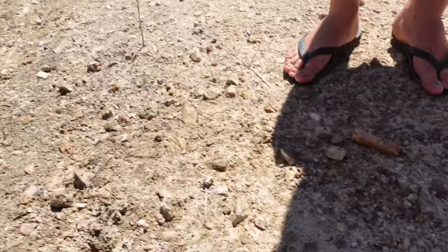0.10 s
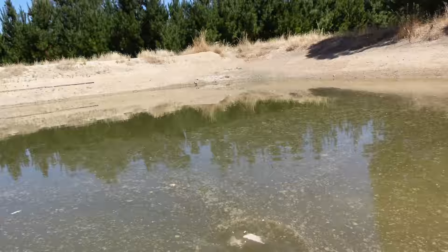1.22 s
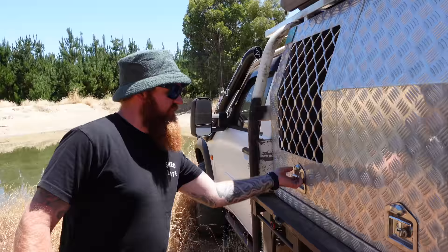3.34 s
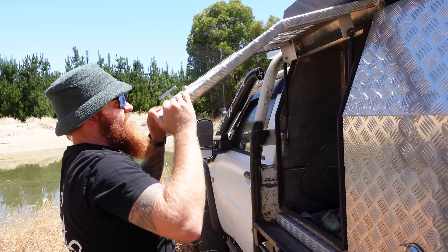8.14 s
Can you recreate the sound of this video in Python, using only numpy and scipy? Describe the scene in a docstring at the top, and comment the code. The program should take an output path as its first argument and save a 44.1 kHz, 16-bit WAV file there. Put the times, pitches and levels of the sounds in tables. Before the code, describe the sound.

Water plops and bubbles twice, then an aluminium door creaks open, its latch clanking and hands rubbing the panel before a hard shudder.

```python
"""Two small splashes slap a still pond and break into ringing bubbles, with a few drips between them.
Then, close by, the aluminium canopy door of a parked truck squeals and creaks free of its seal.
The sheet booms, gas hisses through the struts, and the steel latch clanks as it is worked.
Hands and sleeves rub over the sheet between knocks and dull thuds, and the hollow canopy rumbles.
At the end the door shudders hard and its frame rings on, over a bed of open air."""
import sys
import numpy as np
from scipy import signal
from scipy.fft import rfft, irfft, next_fast_len
from scipy.io import wavfile
from scipy.ndimage import uniform_filter1d, minimum_filter1d, map_coordinates

SR = 44100
rng = np.random.default_rng(int(sys.argv[2]) if len(sys.argv) > 2 else 0)


def log_audio(samples):
    """Write samples as a 16-bit WAV file to the path given in sys.argv[1]."""
    # one column per channel
    frames = np.atleast_2d(samples).T
    # limit to full scale, then quantise
    limited = np.clip(frames, -1, 1)
    pcm = np.round(limited * 32767).astype(np.int16)
    wavfile.write(sys.argv[1], SR, pcm)


N = 407043

# hits on the door, on the latch, and dull ones against the truck:
# (time [s], rattle length [s], bass [dB], mids [dB], treble [dB])
DOOR_HITS = [(3.874, .06, -27, -27, -34), (3.94, .075, -20.5, -21, -29), (4.254, .01, -37, -23.5, -31),
             (4.329, .025, -30, -20.5, -32), (4.694, .005, -34, -31, -34), (4.767, .028, -32, -28, -27.5),
             (6.274, .004, -43, -34.5, -43), (6.748, .025, -29, -24, -27.5), (6.8, .035, -27, -26, -37),
             (6.873, .015, -35, -34, -39), (6.967, .02, -41, -38, -39), (7.014, .014, -32, -20, -28.5),
             (8.53, .008, -47, -34, -45), (8.568, .006, -42, -29, -41), (8.89, .035, -21, -18, -22.5),
             (8.932, .135, -27, -15.3, -21), (9.187, .04, -41, -31, -35.5)]
LATCH_HITS = [(4.626, 0.018, -55, -23.5, -23.5), (4.786, 0.005, -36.5, -33.5, -30),
              (4.905, 0.0044, -44, -50, -38.5), (5.255, 0.0035, -63, -52, -45.0),
              (5.441, 0.015, -66, -37.5, -55), (8.1, 0.004, -47, -25, -31.5), (8.38, 0.016, -57, -45, -39),
              (8.818, 0.0018, -60, -41, -49), (9.196, .025, -50, -30, -37)]
THUD_HITS = [(5.672, .01, -42, -43, -55), (5.82, .03, -44, -42, -52), (6.31, .015, -38, -43, -52),
             (6.39, .02, -40, -40, -56)]
# crossovers of a hit: (bass to mids [Hz], mids to treble [Hz])
CROSSOVERS = [350, 2200]
# tone colour of each struck body: (frequency [Hz], level [dB])
DOOR_EQ = [(21, -21), (35, -27), (136, 2.5), (490, -3), (684, -2.5), (778, -2), (1110, -3), (1810, -8.5),
           (2280, -12), (3020, -11.5), (4920, -20), (5890, -19), (8430, -27.5), (9580, -27), (16000, -50.5)]
LATCH_EQ = [(47, -23), (80, -2), (296, -29.5), (378, -43), (672, -9.5), (802, -47), (877, -3), (1820, -3.5),
            (2180, -12.5), (3030, -11), (7530, -13), (10000, -32), (16000, -78)]
THUD_EQ = [(60, -22), (200, 1.5), (350, -1.5), (550, 1.5), (900, -7), (1500, -22), (5000, -28),
           (16000, -50)]
# decay of each body's dense ring: (frequency [Hz], t60 [s])
DOOR_DECAY = [(100, 0.14), (400, 0.28), (1200, 0.17), (4000, 0.12), (12000, 0.071)]
LATCH_DECAY = [(200, 0.45), (1500, 0.19), (5000, 0.11), (12000, 0.043)]
THUD_DECAY = [(200, 0.18), (800, .1), (4000, .05)]
# clear notes of each ringing part: (frequency [Hz], level [dB], t60 [s])
DOOR_MODES = [(88.973, -10, 0.36), (142, -2, 0.7), (256.4, -8, 0.3), (543, -0.5, 0.17), (677, -1, 0.12),
              (873, -12.5, 0.13), (927, -10.5, 0.44), (1130, -11.5, 0.33), (1573, -18, 0.08)]
LATCH_MODES = [(692, -21, .13), (902.78, -10, 0.1302), (1407, -3, 0.2), (1572, 5.5, 0.12), (1829, -2, 0.13),
               (2774, -3.5, 0.1334), (2950, -15, .15), (3190, -6, 0.1), (4157, -8.5, .1),
               (5500, -13.5, .05), (7100, -60, .06)]
THUD_MODES = [(220, 0, 0.21), (537, -4, .1)]
FRAME_MODES = [(387, 3.5, 1), (413.5, 11, .3), (565, -6, 1), (727, -5, .6), (985, -15, 0.651)]
SPRING_MODES = [(9930, 8.5, 0.12), (10020, 1, 0.12), (9650, 0, .2)]
# hits that ring the door frame and ping the latch spring: (time [s], level [dB])
FRAME_HITS = [(5.441, -50), (9.02, -23)]
SPRING_HITS = [(3.53, -26), (4.628, -37), (9.015, -45), (9.043, -34)]
# sharp snaps of metal on metal: (time [s], level [dB], click tuning [Hz])
ROD_SNAPS = [(3.676, -22, 1180), (3.795, -19, 3300), (3.874, -29, 7060), (4.331, -17, 1112),
             (6.273, -26.5, 3108), (6.931, -30, 3500), (7.603, -33, 3000), (8.1, -30, 6606),
             (8.755, -29, 1180), (8.82, -26, 1300), (8.9305, -8, 3300), (8.996, -14, 3480)]

# slides of the squealing metal, its lower shriek and the creaking seal: (start [s], end [s],
# attack [s], release [s], level [dB], first pitch [Hz], target pitch [Hz], slowing time [s])
SQUEAL_SLIDE = (3.38, 3.535, .022, .045, -15, 6450, 5000, .15)
UNDERTONE_SLIDE = (3.5, 3.545, .03, .06, -24, 4800, 4200, .035)
CREAK_SLIDE = (3.515, 3.855, .185, .04, -24, 1330, 820, .12)
# roughness of each slide: (time [s], chatter [0-1])
SQUEAL_CHATTER = [(3.39, .9), (3.403, .25), (3.416, .8), (3.445, .65), (3.485, .15), (3.52, .9)]
UNDERTONE_CHATTER = [(3.5, .8)]
CREAK_CHATTER = [(3.65, .95), (3.69, .35), (3.8, .5), (3.83, .08)]
# grit of metal, grit of rubber, and how the squealing part radiates: (frequency [Hz], level [dB])
SCRAPE_EQ = [(200, -30.5), (400, -33), (800, -20.5), (3500, -20.5), (5000, 0), (6300, -5.5), (7300, -50),
             (8500, -19), (10000, -24), (11600, -15), (13500, -30), (16000, -48)]
SEAL_EQ = [(100, -26), (220, -5), (330, -17), (600, -10), (900, -6.5), (1220, -0.5), (1700, -13),
           (2600, -16.5), (3200, -8.5), (4000, -25), (5600, -13.5), (8000, -25), (16000, -48)]
RADIATION_EQ = [(4000, 0), (6700, 0), (7600, -7), (9500, -5), (11000, 2), (12600, -1), (14500, -14)]

# spurts of gas through the struts: (start [s], end [s], opening level [dB])
GAS_SPURTS = [(4.25, 4.8, -45), (4.96, 5.08, -50)]
# colour of the gas hiss: (frequency [Hz], level [dB])
HISS_EQ = [(2000, -34), (4000, -11), (5500, -2), (8000, -3), (10000, 4), (11500, -5), (14000, -5),
           (16000, -13)]
# whistles that climb in the hiss: (time [s], first pitch [Hz], level [dB])
GAS_WHISTLES = [(4.3, 7200, -47), (4.33, 5900, -48), (4.42, 8800, -43), (4.518, 7800, -38),
                (4.56, 5400, -42), (4.685, 8200, -36)]

# hand and sleeve strokes on the sheet: (midpoint [s], length [s], rub [dB], swish over rub [dB])
HAND_STROKES = [(4.15, .18, -45, -11), (5.29, .12, -47, -9), (5.63, .1, -60, 5), (5.89, .18, -49, -8),
                (6.09, .24, -45.5, -8), (6.5, .1, -52, 6), (6.6, .16, -54, 0), (6.88, .24, -48, 6),
                (7.2, .14, -47, 0), (7.38, .32, -43.5, 0), (7.6, .1, -48, -4), (7.92, .2, -47, -9),
                (8.22, .12, -49, -3), (8.47, .2, -48, -6), (8.68, .09, -47, 1), (8.8, .22, -44, -9)]
# a hand leans on the sheet: (midpoint [s], length [s], level [dB])
HAND_PRESSES = [(6.13, .2, -49), (7.57, .06, -42), (7.88, .16, -46), (8.06, .22, -41), (8.69, .1, -46)]
# sleeves are never quite still: (start [s], end [s], attack [s], release [s])
SLEEVE_FIDGET = (3.5, 9.23, .1, .1)
# canopy rumble, dull rub and bright swish: (frequency [Hz], level [dB])
RUMBLE_EQ = [(21, -23), (35, -44), (80, -0.5), (176, -0.5), (207, 4.5), (377, -7.5), (415, -1.5),
             (475, -7.5), (900, -13.5), (1170, -54), (1980, -120)]
RUB_EQ = [(350, -16.5), (700, -3), (1800, 1), (3000, -3), (4500, -5), (6500, -30.5)]
SWISH_EQ = [(3500, -24.5), (5500, 5.5), (8000, 0.5), (10000, -4), (13000, -10), (16000, -25)]

# slaps that make up the two splashes: (time [s], level [dB], decay time [s])
WATER_SLAPS = [(.615, -31, .025), (.636, -13.5, .009), (.668, -28, .04), (.743, -22.5, .012),
               (2.123, -23.5, .002), (2.227, -22.5, .0025), (2.365, -42, .06), (2.464, -34, .0036),
               (2.525, -36.5, .045), (2.599, -20.5, .0025), (2.626, -27.5, .016)]
# the largest bubbles: (time [s], level [dB], first pitch [Hz], t60 [s])
BIG_BUBBLES = [(.641, -13.5, 1094, .017), (.678, -18.5, 1700, .011), (.686, -24, 565, .06),
               (.727, -22, 1050, .017), (.751, -13, 2283, .01), (.843, -40, 1421, .1),
               (.919, -31.5, 950, .1), (2.209, -30, 854, .013), (2.471, -28.5, 2494, .033),
               (2.553, -29, 2190, .042), (2.603, -36, 915, .09), (2.624, -20, 1900, .013),
               (2.636, -23, 1420, .021), (2.647, -25.5, 2541, .035)]
# a thin string of drips on one pitch: (time [s], level [dB])
DRIPS = [(1.277, -39), (1.304, -39), (1.372, -36), (1.4, -37), (1.445, -27.5)]
# cavities that close with a steeply rising gloop: (time [s], level [dB])
GLOOPS = [(.773, -35), (2.665, -36)]
# the splashes move from left to right: (time [s], left minus right [dB])
POND_PAN = [(1.4, 1.5), (2.5, -4)]

# open air over the water: (frequency [Hz], level [dB])
AIR_EQ = [(18, -99), (30, -26.5), (189, -6.5), (233, -5.5), (273, -5), (374, -10.5), (569, -8),
          (1070, -17.5), (1320, -15), (2410, -22), (16000, -37)]
# reflections off the truck's side and the ground: (frequency [Hz], t60 [s])
REFLECTION_DECAY = [(150, 0.48), (1500, 0.073), (10000, 0.03336)]
# slight lean of the stereo image: (frequency [Hz], left minus right [dB])
STEREO_LEAN = [(60, .5), (200, .2), (600, -1.2), (2400, -1.1), (6000, -2.2), (10000, .5)]


def door():
    """The aluminium sheet booms and rattles; its frame sings on after the hardest hit."""
    sheet = strike(DOOR_HITS, DOOR_EQ, DOOR_DECAY, DOOR_MODES,
                   clear_db=-6.5, crack_db=-6, rattle_rate=600, rattle_db=-6.5)
    return amp(-2.5) * sheet + sing(FRAME_HITS, FRAME_MODES, swell_s=.017)


def latch():
    """The steel latch clanks against its keeper, its rods snap and its spring pings."""
    out = strike(LATCH_HITS, LATCH_EQ, LATCH_DECAY, LATCH_MODES,
                 clear_db=2, crack_db=-4, rattle_rate=600, rattle_db=-4)
    for s, db, hz in ROD_SNAPS:
        add(out, s, amp(db) * click(hz, t60=.027))
    return out + sing(SPRING_HITS, SPRING_MODES, swell_s=.0052)


def squeal(surge_db=2, surge_peak_s=3.415, surge_period_s=.105):
    """Bare metal shrieks in two rough tones that sink as it slows; the upper one surges twice."""
    high = stick_slip(SQUEAL_SLIDE, SQUEAL_CHATTER, slip_rate=330, slip_t60=.0065,
                      harmonics_db=[1.3, -26], grit_eq=SCRAPE_EQ, grit_db=-10.5, waver=.011)
    low = stick_slip(UNDERTONE_SLIDE, UNDERTONE_CHATTER, slip_rate=300, slip_t60=.005,
                     harmonics_db=[0], grit_eq=SCRAPE_EQ, grit_db=-20, waver=.03)
    surge = amp(surge_db * np.cos(2 * np.pi * (np.arange(N) / SR - surge_peak_s) / surge_period_s))
    return coloured(surge * high + low, RADIATION_EQ)


def creak():
    """The rubber seal grips and slips as it drags over the frame."""
    return stick_slip(CREAK_SLIDE, CREAK_CHATTER, slip_rate=170, slip_t60=.03,
                      harmonics_db=[-2.5, -36, -32, -21], grit_eq=SEAL_EQ, grit_db=1.5, waver=.012)


def water(rise=.61, spray_hz=2200, spray_rate=1900, spray_cycles=26, drip_hz=2450, drip_t60=.009):
    """A crackling slap sheds a spray of small bubbles; big ones and drips follow, each with a tick."""
    out = np.zeros(N)
    t = np.arange(SR // 3) / SR
    slap_eq = [(100, -20), (450, 4), (1100, 3.5), (1800, 13), (3000, 7), (7500, 5.5), (11000, 0),
               (16000, -9.5)]
    for s, db, decay in WATER_SLAPS:
        attack = 1 - np.exp(-t / (.25 * decay))
        fall = np.exp(-t / decay) + .1 * np.exp(-t / (7 * decay))
        crackle = unit(rng.standard_normal(len(t)) * amp(3.5 * wobble(600, len(t))))
        add(out, s, amp(db - 10) * coloured(crackle * attack * fall, slap_eq))
        for wait, pitch, softness in rng.random((int(spray_rate * decay) + 1, 3)):
            hz = spray_hz * 3 ** (2 * pitch - 1)
            onset = s - 2 * decay * np.log(1 - wait)
            gain = amp(db - 3 - 10 * softness - 10 * wait)
            add(out, onset, gain * bubble(hz, spray_cycles / hz, rise))
    drips = [(s, db, drip_hz, drip_t60) for s, db in DRIPS]
    for s, db, hz, t60 in BIG_BUBBLES + drips:
        climb = rise * min(1, hz / 2200) ** 2  # big, deep bubbles climb less
        add(out, s, amp(db) * bubble(hz, t60, climb))
        add(out, s, amp(db - 11) * click(1.45 * hz, t60=.0054))
    for s, db in GLOOPS:
        add(out, s, amp(db) * bubble(hz=900, t60=.08, rise=2.6))
    return out


def spatter(most_drops=150, mean_flight_s=.2, drop_hz=3600, drop_cycles=18):
    """Fine drops fall back one after another; soft or brief slaps throw up few."""
    out = np.zeros(N)
    for s, db, decay in WATER_SLAPS:
        thrown = min(1, 3 * amp(db)) * min(1, decay / .009)
        for wait, pitch, softness in rng.random((int(most_drops * thrown) + 1, 3)):
            hz = drop_hz * 2 ** (2 * pitch - 1)
            landing = s - mean_flight_s * np.log(1 - wait)
            gain = amp(db - 19 - 8 * softness - 4.9 * wait)
            add(out, landing, gain * bubble(hz, drop_cycles / hz, rise=.3))
    return out


def struts(growth_db_per_s=15, whistle_s=.17, climb_hz_per_s=12500):
    """Gas squeezes through the struts: each spurt builds, and whistles sweep up through the first."""
    t = np.arange(N) / SR
    flow = np.zeros(N)
    for start, end, db in GAS_SPURTS:
        build = amp(db + growth_db_per_s * (np.minimum(t, end) - start))
        flow += build * envelope(t, start, end, attack=.07, release=.07)
    out = flow * rush(HISS_EQ, grain_db=3, rate=300)
    n = int(whistle_s * SR)
    for s, first_hz, db in GAS_WHISTLES:
        hz = (first_hz + climb_hz_per_s * t[:n]) * (1 + .0223 * wobble(1200, n))
        whistle = np.sin(2 * np.pi * np.cumsum(hz) / SR)
        add(out, s, amp(db) * np.sqrt(2 * np.hanning(n)) * whistle)
    return out


def thuds():
    """Soft, heavy contacts against the truck, with hardly any ring."""
    return strike(THUD_HITS, THUD_EQ, THUD_DECAY, THUD_MODES,
                  clear_db=-4.5, crack_db=-7, rattle_rate=500, rattle_db=-4)


def handling():
    """Hands and sleeves rub and swish on the sheet; strokes, presses and hits make the canopy rumble."""
    fidget = envelope(np.arange(N) / SR, *SLEEVE_FIDGET) * amp(2 * wobble(12))
    shake = canopy_shake()
    presses = swells(HAND_PRESSES)
    strokes = swells([(s, length, db) for s, length, db, _ in HAND_STROKES])
    bright_strokes = swells([(s, length, db + bright) for s, length, db, bright in HAND_STROKES])
    rumble = np.linalg.norm([amp(-8) * shake, presses, amp(-8) * strokes, amp(-57) * fidget], axis=0)
    buzz = amp(-15) * shake  # the sheet buzzes along with the canopy
    rub = np.linalg.norm([buzz, strokes, amp(-55) * fidget], axis=0)
    swish = np.hypot(bright_strokes, amp(-61) * fidget)
    return (rumble * rush(RUMBLE_EQ, grain_db=3, rate=51)
            + rub * rush(RUB_EQ, grain_db=2.5, rate=240)
            + swish * rush(SWISH_EQ, grain_db=3, rate=310))


def canopy_shake(swell_s=.035, t60=1.3):
    """Gain curve of the hollow canopy, which stores the bass of each hit and lets it fade."""
    t = np.arange(2 * SR) / SR
    power = np.zeros(N)
    bloom = (1 - np.exp(-t / swell_s)) * fade(t, t60)
    for s, _, bass_db, *_ in DOOR_HITS + THUD_HITS:
        add(power, s, (amp(bass_db) * bloom) ** 2)
    return np.sqrt(power)


def air(bed_db=-57, ring_db=-52.5):
    """A steady bed of open air; a faint high ring dies away at the start."""
    ring_eq = [(600, -44), (1280, -12.5), (1390, -1.5), (1520, -17), (1850, -14.5), (2600, -22),
               (3900, -19), (9000, -34.5)]
    bed = unit(coloured(rng.standard_normal(N), AIR_EQ))
    ring = unit(coloured(rng.standard_normal(N), ring_eq))
    return amp(bed_db) * bed + amp(ring_db) * ring * fade(np.arange(N) / SR, t60=1.35)


def strike(hits, eq, decay, clear_modes, clear_db, crack_db, rattle_rate, rattle_db):
    """A loose part hits and chatters; every contact cracks and rings the body."""
    out = np.zeros(N)
    t = np.arange(SR // 2) / SR
    lead_s, lead_db = .004, -16  # a light touch just ahead of each hit
    splits = [(CROSSOVERS[0], "low"), (CROSSOVERS, "band"), (CROSSOVERS[1], "high")]
    bands = [signal.butter(4, edge, kind, fs=SR, output="sos") for edge, kind in splits]
    for s, length, *levels in hits:
        crack = rng.standard_normal(len(t)) * fade(t, .0078)
        dense = coloured(tail(decay) + amp(crack_db) * crack / np.linalg.norm(crack), eq)
        body = unit(dense) + amp(clear_db) * unit(modes(clear_modes, t))
        rattle = (rng.random(len(t)) < rattle_rate / SR) & (t < length)
        contacts = amp(rattle_db) * rattle * rng.uniform(-1.71, 1.47, len(t))
        contacts[0] = 1  # the hit itself
        contacts = np.r_[amp(lead_db), np.zeros(int(lead_s * SR)), contacts]
        sound = signal.fftconvolve(contacts, body)[:len(t)]
        attack = t < length + .025  # each band's level is set over this stretch
        for sos, db in zip(bands, levels):
            band = signal.sosfilt(sos, sound)
            add(out, s - lead_s, amp(db) * band / np.sqrt(np.mean(band[attack] ** 2)))
    return out


def sing(hits, table, swell_s):
    """A lightly damped part picks up each hit and rings on."""
    out = np.zeros(N)
    t = np.arange(SR) / SR
    for s, db in hits:
        add(out, s, amp(db) * modes(table, t, scatter_db=0) * (1 - np.exp(-t / swell_s)))
    return out


def stick_slip(slide, chatter_curve, slip_rate, slip_t60, harmonics_db, grit_eq, grit_db, waver):
    """A rubbed edge sings steadily, or breaks into separate slips that each restart the tone."""
    start, end, attack, release, db, first_hz, target_hz, slowing = slide
    n = SR  # one second holds the slide and its tail
    t = np.arange(n) / SR
    force = envelope(start + t, start, end, attack, release)
    hz = target_hz + (first_hz - target_hz) * np.exp(-t / slowing)
    chatter = np.clip(np.interp(start + t, *np.transpose(chatter_curve)), 0, 1)
    gaps, sizes, turns = rng.random((3, 1000))
    onsets = np.cumsum(.4 + 1.2 * gaps) / slip_rate * SR
    heard = onsets < n
    kicks = np.zeros(n, complex)  # each slip has its own strength and phase
    kicks[onsets[heard].astype(int)] = ((.5 + sizes) * np.exp(2j * np.pi * turns))[heard]
    slip_shape = fade(t, slip_t60) * (1 - fade(t, slip_t60 / 4)) ** 2
    slips = signal.fftconvolve(kicks, slip_shape[:SR // 20])[:n]
    slips /= np.sqrt(np.average(np.abs(slips) ** 2, weights=force))
    swing = np.sqrt(1 - chatter) + np.sqrt(chatter) * slips
    swing /= np.sqrt(1 + (np.abs(swing) / 2) ** 2)  # the swing is softly capped, so its loudest peaks flatten
    phase = 2 * np.pi * np.cumsum(hz * (1 + waver * wobble(150, n))) / SR + np.angle(swing)
    tone = np.sqrt(2) * sum(amp(level) * np.sin(k * phase) for k, level in enumerate(harmonics_db, 1))
    scrape = amp(grit_db) * np.sqrt(chatter) * unit(coloured(rng.standard_normal(n), grit_eq))
    out = np.zeros(N)
    add(out, start, amp(db) * force * np.abs(swing) * (tone + scrape))
    return out


def bubble(hz, t60, rise):
    """A bubble rings and climbs in pitch as it nears the surface."""
    t = np.arange(int(t60 * SR) + 2) / SR
    chirp = np.sin(2 * np.pi * hz * (t + rise * t * t / (2 * t60)))
    return chirp * fade(t, t60) * (1 - np.exp(-t * hz))


def click(hz, t60):
    """A short broad burst of peak 1, strongest a little above hz."""
    t = np.arange(SR // 20) / SR
    eq = [(hz / 5, -24), (hz * 1.22, -2), (hz * 1.45, 0), (hz * 1.24, -10), (hz * 5, -22)]
    burst = coloured(rng.standard_normal(len(t)) * fade(t, t60), eq)
    return burst / np.abs(burst).max()


def modes(table, t, scatter_db=2):
    """Clear decaying notes, their strengths scattered anew for each hit."""
    return sum(amp(db + scatter_db * rng.normal()) * fade(t, t60) * np.sin(2 * np.pi * hz * t)
               for hz, db, t60 in table)


def tail(decay):
    """A dense ring of energy 1, each frequency dying at its own speed."""
    hz, t, spectrum = signal.stft(rng.standard_normal(SR // 2), SR, nperseg=256)
    t60 = along(decay, hz)[:, None]
    ring = signal.istft(spectrum * fade(t, t60) / np.sqrt(t60), SR, nperseg=256)[1][:SR // 2]
    return ring / np.linalg.norm(ring)


def rush(eq, grain_db, rate):
    """Grainy noise of rms 1 whose level flickers rate times a second."""
    return unit(coloured(rng.standard_normal(N) * amp(grain_db * wobble(rate)), eq))


def envelope(t, start, end, attack, release):
    """Swells over attack, holds until end, then falls by 20 dB every release."""
    return np.clip((t - start) / attack, 0, 1) ** 1.5 * amp(-20 * np.maximum(t - end, 0) / release)


def swells(rows):
    """Gain curve of smooth swells that add in power: (midpoint [s], length [s], level [dB])."""
    power = np.zeros(N)
    for s, length, db in rows:
        arch = 1 - np.linspace(-1, 1, int(length * SR)) ** 2
        add(power, s - length / 2, (amp(db) * arch) ** 2)
    return np.sqrt(power)


def coloured(x, eq, size=4096):
    """x through a minimum-phase EQ, so nothing rings ahead of an attack."""
    gain = amp(along(eq, np.fft.rfftfreq(size, 1 / SR)))
    cepstrum = irfft(np.log(gain + 1e-6))
    cepstrum[1:size // 2] *= 2
    cepstrum[size // 2 + 1:] = 0
    impulse = irfft(np.exp(rfft(cepstrum)))[:size // 2]
    return signal.oaconvolve(x, impulse)[:len(x)]


def filtered(x, response):
    """x through a zero-phase filter of gain response(hz)."""
    n = x.shape[-1]
    padded = next_fast_len(n + 8192)
    return irfft(rfft(x, padded) * response(np.fft.rfftfreq(padded, 1 / SR)), padded)[..., :n]


def along(points, hz):
    """A curve of (frequency [Hz], value) points, read on a log axis."""
    knots_hz, values = np.transpose(points)
    return np.interp(np.log(hz + 1), np.log(knots_hz + 1), values)


def wobble(rate, n=N):
    """A smooth random curve, rate knots a second."""
    return map_coordinates(rng.standard_normal(int(n * rate / SR) + 4), [np.arange(n) * rate / SR])


def fade(t, t60):
    """Exponential decay, 60 dB down after t60."""
    return np.exp(-np.log(1000) * t / t60)


def amp(db):
    """Decibels to gain."""
    return np.exp(np.asarray(db) * np.log(10) / 20)


def unit(x):
    """Scaled to rms 1."""
    return x / np.sqrt(np.mean(np.abs(x) ** 2) + 1e-20)


def add(track, s, sound):
    """Mix a sound into the track at s seconds."""
    part = track[round(s * SR):][:len(sound)]
    part += sound[:len(part)]


def scene():
    """The truck sits near centre, the splashes left then right; faint reflections add width."""
    pond = water() + spatter()
    centre = air() + door() + thuds() + latch() + squeal() + creak() + struts() + handling()
    reflection_eq = [(80, -25), (250, -22), (600, -17), (10000, -22)]  # the bass stays nearly mono
    reflections = coloured(tail(REFLECTION_DECAY), reflection_eq)
    side = signal.fftconvolve(centre + pond, reflections)[:N]
    stereo = np.array([centre + side, centre - side])
    stereo = filtered(stereo, lambda hz: amp(np.outer([.5, -.5], along(STEREO_LEAN, hz))))
    pan_db = np.interp(np.arange(N) / SR, *np.transpose(POND_PAN))
    return stereo + pond * amp(np.outer([.5, -.5], pan_db))


def record(dry):
    """Master chain: a low cut, a peak limiter and a brick-wall high cut."""
    low_cut_hz, ceiling, high_cut_hz = 68, .76, 16000
    x = signal.sosfilt(signal.butter(3, low_cut_hz, "high", fs=SR, output="sos"), dry)
    needed_gain = np.minimum(1, ceiling / (np.abs(x).max(axis=0) + 1e-9))
    gain = uniform_filter1d(minimum_filter1d(needed_gain, size=129), size=129)
    return filtered(x * gain, lambda hz: hz < high_cut_hz)


dry = scene()
out = record(dry)
log_audio(out)
```